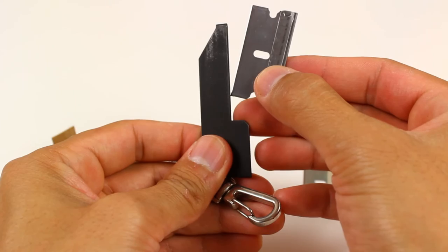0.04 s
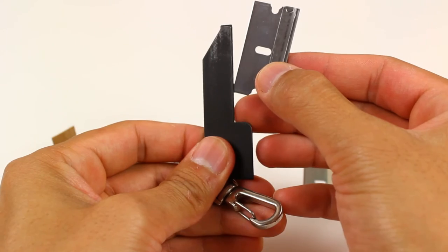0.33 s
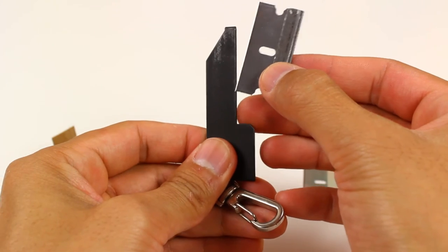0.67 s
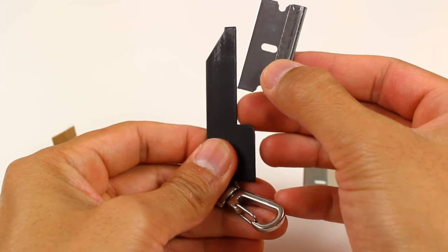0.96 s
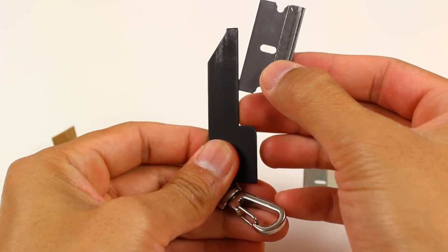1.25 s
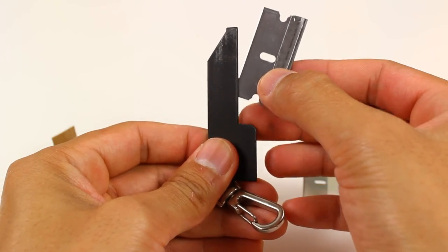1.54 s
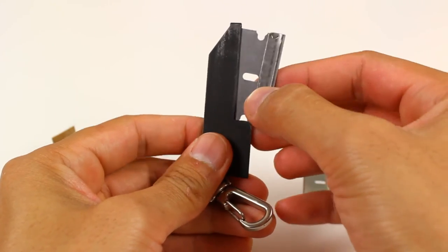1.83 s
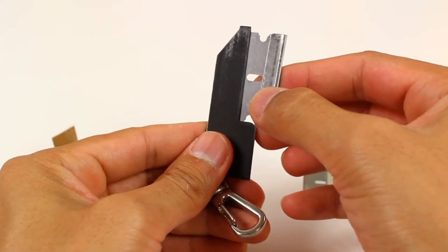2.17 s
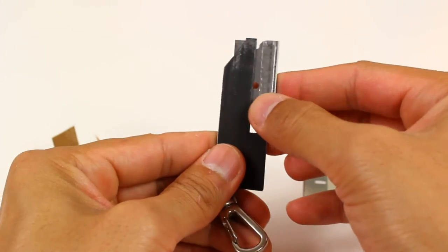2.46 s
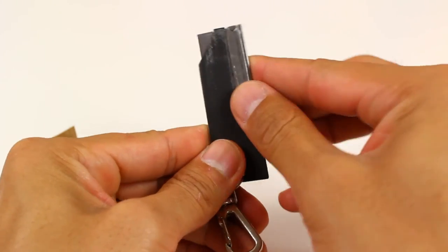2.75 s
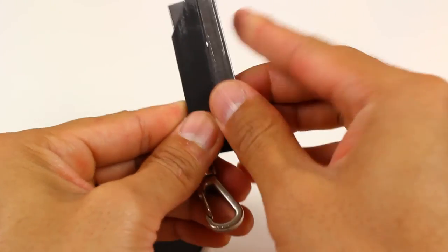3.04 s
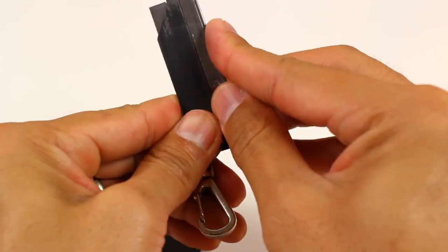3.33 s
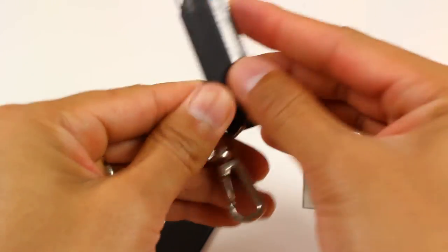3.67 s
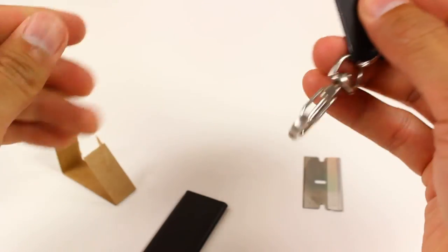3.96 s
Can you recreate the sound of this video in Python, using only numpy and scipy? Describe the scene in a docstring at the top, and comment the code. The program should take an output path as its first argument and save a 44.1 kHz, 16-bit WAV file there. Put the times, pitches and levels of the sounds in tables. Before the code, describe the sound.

A razor blade ticks and scrapes into a small metal holder, then snaps into place.

```python
"""A razor blade is fitted into a small metal key-ring holder, close by in a quiet room.
The loose blade ticks against the holder, catches on the slot, scrapes in and slides home under a
creaking grip, then seats with a sharp snap. The key-ring clasp clinks as the hands let go.
Each hit or tiny slip makes the metal ring briefly. Rumble, hiss, hum and faint, evenly spaced
thumps lie under it all."""
import sys
import numpy as np
from scipy import signal
from scipy.fft import rfft, irfft, next_fast_len
from scipy.io import wavfile
from scipy.ndimage import map_coordinates

SR = 44100
rng = np.random.default_rng(int(sys.argv[2]) if len(sys.argv) > 2 else 0)


def pcm_store(signal):
    """Save signal as 16-bit PCM."""
    levels = np.round(np.clip(np.atleast_2d(signal), -1, 1) * 32767)
    wavfile.write(sys.argv[1], SR, levels.astype(np.int16).T)


N = 176400


def amp(db):
    """Turns decibels into a number to multiply by."""
    return 10 ** (np.asarray(db) / 20)


def unit(x):
    """Scales a sound to an average (rms) level of 1."""
    return x / np.sqrt(np.mean(x ** 2) + 1e-20)


def norm(x):
    """Scales a sound to a total energy of 1."""
    return x / np.sqrt(np.sum(x ** 2) + 1e-20)


def along(points, hz):
    """Reads between (Hz, value) points, with the octaves evenly spaced."""
    point_hz, values = np.transpose(points)
    return np.interp(np.log(hz + 1), np.log(point_hz + 1), values)


def filtered(x, response):
    """Multiplies each frequency in a sound by response(hz)."""
    size = next_fast_len(N + SR // 2)
    return irfft(rfft(x, size) * response(np.fft.rfftfreq(size, 1 / SR)), size)[..., :N]


def add(track, start, sound):
    """Mixes a sound into a track at a start time in seconds."""
    part = track[max(round(start * SR), 0):][:len(sound)]
    part += sound[:len(part)]


def panned(x, db):
    """Sets the left side db above the right; a negative db leans right."""
    return x * amp([[db / 2], [-db / 2]])


def wobble(rate):
    """A smooth curve through rate random values a second."""
    return map_coordinates(rng.standard_normal(int(N * rate / SR) + 4), [np.arange(N) * rate / SR])


def stroke(start, length, rise_s, fall_s):
    """A loudness curve that rises, holds, then fades once length seconds have passed."""
    t = np.arange(N) / SR - start
    return np.clip(t / rise_s, 0, 1) * np.exp(-np.maximum(t - length, 0) / fall_s)


def ring(modes, size=8192):
    """An object's own tones (modes), varied a little each time; each fades 60 dB in its ring time."""
    t = np.arange(size) / SR
    tones = 0
    for hz, db, ring_s in modes:
        gain = amp(db + rng.normal(0, 1.03))
        tones += gain * norm(amp(-60 * t / ring_s) * np.sin(2 * np.pi * (hz * t + rng.random())))
    return norm(tones)


def body(colour, modes, ring_db, size=8192):
    """A small part's answer to one hit: a crack with the given tone colour, plus ringing."""
    cepstrum = irfft(np.log(amp(along(colour, np.fft.rfftfreq(size, 1 / SR)))))
    # Folding the second half onto the first packs the crack's energy at its start.
    cepstrum[1:size // 2] *= 2
    cepstrum[size // 2 + 1:] = 0
    crack = norm(irfft(np.exp(rfft(cepstrum))))
    return norm(crack + amp(ring_db) * ring(modes))


def contacts(rows, colour, modes, ring_db, grit_db):
    """Each contact is a hit followed by a gritty drag that quickly fades."""
    track, t = np.zeros(N), np.arange(SR // 20) / SR
    for start, db, drag_s in rows:
        force = amp(grit_db) * norm(rng.standard_normal(len(t)) * np.exp(-t / drag_s))
        force[0] += 1  # the hit itself
        add(track, start, amp(db) * norm(signal.fftconvolve(force, body(colour, modes, ring_db))))
    return track


def slips(per_second, spread_db):
    """Rubbing surfaces stick and let go, giving tiny kicks at random moments."""
    chance, size, sign = rng.random(N), rng.standard_normal(N), rng.choice([-1, 1], N)
    return (chance < per_second / SR) * sign * amp(spread_db * np.clip(size, -2, 2))


def friction(strokes, answer, points=6):
    """Tiny slips at several points of the edge, each with its own tone colour, shake the metal."""
    slips_per_s, contact_s = 900, .00012
    effort = sum(amp(db) * stroke(start, length, rise_s=.0031, fall_s=.0045)
                 for start, length, db in strokes)
    t = np.arange(len(answer)) / SR
    track = np.zeros(N)
    for _ in range(points):
        kicks = effort * unit(slips(slips_per_s / points, spread_db=2))
        force = rng.standard_normal(len(t)) * np.exp(-t / contact_s)
        one_slip = norm(signal.fftconvolve(answer, force)[:len(t)])
        track += signal.oaconvolve(kicks, one_slip)[:N]
    return track / np.sqrt(points)


def background():
    """Room rumble, faint hiss and the hum of mains power."""
    # The rumble and hiss. Each row: frequency in Hz, relative level in dB.
    noise_colour = [(12, -44.5), (20, 3.5), (45, -5), (168, -16.5), (377, -21.5), (558, -25), (642, -25.5),
                    (897, -28.5), (1480, -31), (1610, -32), (2460, -35), (3250, -36.5), (4670, -38.5),
                    (14300, -42), (16000, -43)]
    # Each row: frequency in Hz, how alike left and right are (1 means the same).
    likeness = [(30, 0.52), (120, 0.079), (300, 0.084), (600, 0.14), (2000, 0.072), (12000, 0.056)]
    # Each row: pitch in Hz, average (rms) level in dB.
    hum_tones = [(120, -67), (239, -75.5), (360, -81)]

    def mid_and_side(hz):
        """Splits the noise into a part both ears share and a part they get with opposite signs."""
        angle = np.arccos(np.clip(along(likeness, hz), -1, 1)) / 2
        return amp(along(noise_colour, hz)) * [np.cos(angle), np.sin(angle)]

    mid, side = filtered(rng.standard_normal((2, N)), mid_and_side)
    t = np.arange(N) / SR
    hum = sum(amp(db) * np.sqrt(2) * np.sin(2 * np.pi * (hz * t + rng.random())) for hz, db in hum_tones)
    return amp(-51.5) * unit(np.array([mid + side, mid - side])) + hum


def thumps():
    """Soft, evenly spaced pulses, likely electrical interference in the microphone amplifier."""
    # Each entry: one pulse's length in seconds.
    lengths = [0.057, .021, .018, 0.021, 0.0217, 0.047, 0.0235, .024]
    first_s, period_s, low_cut_hz = .081, .5565, 1.45
    pulses = sum(stroke(first_s + k * period_s, length, rise_s=.0126, fall_s=.0095)
                 for k, length in enumerate(lengths))
    # The amplifier blocks the very slowest changes.
    return amp(-36) * filtered(pulses, lambda hz: 1j * hz / (low_cut_hz + 1j * hz))


def room(x):
    """Dense early echoes from table and walls, then a short tail, different at each ear."""
    # Each row: frequency in Hz, seconds the echo takes to fade by 60 dB.
    fade_times = [(300, 0.32), (3000, 0.41), (8000, 0.37), (15000, 0.16)]
    wall_delay_s, early_db, early_s = .0045, 3, .011
    hz, t, bands = signal.stft(rng.standard_normal((2, SR // 2)), SR, nperseg=256)
    tail = signal.istft(bands * amp(-60 * t / along(fade_times, hz)[:, None]), SR, nperseg=256)[1]
    t = np.arange(tail.shape[1]) / SR
    echoes = np.sqrt(2) * norm(tail * (1 + amp(early_db) * np.exp(-t / early_s)))
    delayed = np.pad(x, (round(wall_delay_s * SR), 0))
    return signal.fftconvolve(delayed[None], echoes, axes=1)[:, :N]


def creak():
    """A hollow rub over a wavering groan, likely a fingertip slipping as it presses the blade in."""
    # The rub's loudness. Each row: time in seconds, relative level in dB.
    rub_levels = [(2.43, -67), (2.438, -77), (2.448, -61.5), (2.49, -54.5), (2.506, -58), (2.562, -58.5),
                  (2.578, -76), (2.592, -60), (2.624, -77), (2.64, -70)]
    # The rub's tones. Each row: pitch in Hz, relative level in dB, ring time in seconds.
    modes = [(640, -4, 0.02), (1015, 0, .04), (1130, -3, .025), (1270, -4.5, 0.031), (1380, -4, 0.083),
             (1680, -7, 0.03), (2000, -13, 0.017)]
    # The creak's lowest tone sings. Each row: start and length in seconds, level in dB, pitch in Hz.
    groans = [(2.455, .033, -55, 585), (2.494, .01, -54, 625), (2.522, 0.028, -53, 576.5),
              (2.565, 0.035, -60, 568)]
    waver_hz, rough_db = 12.5, 3.5
    times, levels_db = np.transpose(rub_levels)
    level = amp(1 + np.interp(np.arange(N) / SR, times, levels_db, left=-120, right=-120))
    rub = level * unit(signal.fftconvolve(slips(per_second=400, spread_db=0), ring(modes))[:N])
    drift = np.cumsum(waver_hz * wobble(200))
    groan = np.zeros(N)
    for start, length, db, hz in groans:
        tone = np.sin(2 * np.pi * (hz * np.arange(N) + drift) / SR)
        groan += amp(db) * stroke(start, length, rise_s=.005, fall_s=.0095) * tone
    return rub + groan * amp(rough_db * wobble(150))


def clasp():
    """As the fingers let go, the swivel ticks round and the steel clasp swings against its ring."""
    # Each row: start in seconds, level in dB, drag time in seconds.
    swivel_ticks = [(3.711, -32, 0.0024), (3.733, -19.5, 0.0025), (3.755, -26.5, 0.0013),
                    (3.818, -34, .001)]
    clinks = [(3.833, -8.5, .0009), (3.842, -25, .003), (3.8535, -21, 0.0027), (3.876, -26, .0012)]
    # Each part's crack. Each row: frequency in Hz, relative level in dB.
    swivel_colour = [(400, -16), (2000, -19), (4200, -10), (5400, -8), (6600, -11), (8700, -2.5),
                     (11500, -0.5), (13000, -5), (14000, -11), (16000, -13)]
    clasp_colour = [(300, -13), (1200, -19), (2300, -11), (3100, -14), (5000, -10), (6800, -3.5),
                    (7800, -7), (9300, -7), (10200, 1.5), (12800, -1.5), (14300, -2), (16000, -5)]
    # Each part's tones. Each row: pitch in Hz, relative level in dB, ring time in seconds.
    swivel_modes = [(5340, -5.5, 0.0074), (9400, -2, .012), (11100, 4, .008), (12900, -2, .012)]
    clasp_modes = [(2400, -17.5, 0.012), (3870, -7, 0.012), (5130, -4.5, 0.0084), (6540, 2, 0.0061),
                   (7130, -7, 0.021), (8200, -8, 0.0072), (10100, -3.5, .004), (11100, -7, 0.0055),
                   (14000, -11, .012)]
    return (contacts(swivel_ticks, swivel_colour, swivel_modes, ring_db=-8, grit_db=6)
            + contacts(clinks, clasp_colour, clasp_modes, ring_db=-4, grit_db=-2))


def blade_ticks():
    """The loose blade touches the holder and rings freely."""
    # Each row: start in seconds, level in dB, drag time in seconds.
    touches = [(.194, -36.5, 0.0012), (.255, -36.5, 0.00092), (.260, -43, 0.00087), (.267, -37, 0.0018),
               (.481, -31, .012), (.7308, -26, .002), (.733, -28.5, 0.0026), (1.069, -36.5, 0.0043)]
    # The blade's crack. Each row: frequency in Hz, relative level in dB.
    colour = [(500, -23), (2000, -7), (4500, -3), (6000, 0), (7200, -8), (9500, 1), (12500, -11),
              (16000, -12)]
    # The blade's tones. Each row: pitch in Hz, relative level in dB, ring time in seconds.
    modes = [(5200, -1, .09), (6010, -3, .012), (6300, -11, .08), (8160, 3, .07), (11780, -4, .018)]
    return contacts(touches, colour, modes, ring_db=1, grit_db=-1)


def blade_in_slot():
    """The edge catches on the mouth of the slot and scrapes along it, which dulls its ringing."""
    # Each row: start in seconds, level in dB, drag time in seconds.
    catches = [(1.339, -37.5, 0.0022), (1.358, -35, 0.0011), (1.379, -35.5, 0.0027), (1.446, -40, .004),
               (1.486, -38.5, 0.0025), (1.518, -38, 0.0035), (1.553, -34.5, 0.0038), (1.573, -33, 0.009),
               (1.601, -33.5, 0.0055), (1.649, -46, .004), (1.691, -35, .008), (1.732, -29, 0.0017),
               (1.746, -28.5, 0.0017), (1.814, -23, 0.0024), (1.8255, -31, .002)]
    # Each row: start and length in seconds, level in dB.
    scrapes = [(1.62, .1, -63), (1.73, 0.044, -54.5), (1.785, .042, -57)]
    # The crack of edge on slot. Each row: frequency in Hz, relative level in dB.
    colour = [(500, -8), (3500, -13.5), (4800, -5.5), (7500, -4), (10200, -1.5), (12400, 2), (13600, -9),
              (16000, -12)]
    # The metal's tones. Each row: pitch in Hz, relative level in dB, ring time in seconds.
    modes = [(4760, -3, .06), (5190, -5.5, 0.036), (6020, -1, .008), (10350, -1.5, .006),
             (12600, -3, 0.0048)]
    return (contacts(catches, colour, modes, ring_db=-5, grit_db=7)
            + friction(scrapes, body(colour, modes, ring_db=-10)))


def blade_squeaks():
    """Where the edge bites, the blade flexes and sings one tone, its pitch set by the contact point."""
    # Each row: start and length in seconds, level in dB, pitch in Hz.
    bites = [(1.377, 0.0054, -60.5, 4730), (1.515, .007, -61, 5100), (1.569, 0.013, -64.5, 4900),
             (1.599, .01, -64, 4730), (1.738, .03, -56.5, 5280), (1.752, .026, -56.5, 4460),
             (1.745, 0.031, -60.5, 4890)]
    ring_s = .029
    track, t = np.zeros(N), np.arange(SR // 10) / SR
    for start, length, db, hz in bites:
        force = rng.standard_normal(len(t)) * (t < length)
        squeak = norm(signal.fftconvolve(force, ring([(hz, 0, ring_s)])))
        add(track, start, amp(db) * np.sqrt(length * SR) * squeak)
    return track


def blade_in_holder():
    """The blade knocks and slides inside the holder, which stops its ringing almost at once."""
    # Each row: start in seconds, level in dB, drag time in seconds.
    knocks = [(1.952, -31.5, 0.0014), (1.961, -35.5, 0.0024), (2.013, -36.5, 0.0054),
              (2.424, -28.5, 0.0044), (2.460, -34.5, 0.002), (2.554, -22, 0.0066), (2.7915, -25, 0.0017),
              (3.295, -28, 0.0014), (3.3215, -29, 0.0018)]
    # Each row: start and length in seconds, level in dB.
    slides = [(2.11, 0.037, -67.5), (2.224, 0.019, -62), (2.313, 0.045, -59.5), (2.425, 0.038, -61.5),
              (2.56, .02, -72)]
    # The holder's crack. Each row: frequency in Hz, relative level in dB.
    colour = [(400, -5), (2000, -7.5), (3200, -8), (4600, -9), (7200, -7), (9500, 0.5), (11000, -5),
              (13200, -1), (16000, -19)]
    # The holder's tones. Each row: pitch in Hz, relative level in dB, ring time in seconds.
    modes = [(2870, 0, .015), (3240, -5, .012), (5270, -4.5, .008), (7060, 3, .009), (9100, -30, .007),
             (9700, -10, .008)]
    return (contacts(knocks, colour, modes, ring_db=-3.5, grit_db=13)
            + friction(slides, body(colour, modes, ring_db=-10)))


def blade_snap():
    """The blade snaps into its seat: one hard, bright hit with little ringing."""
    # The one row: start in seconds, level in dB, drag time in seconds.
    snap = [(3.3472, -5, 0.00036)]
    # The snap's crack. Each row: frequency in Hz, relative level in dB.
    colour = [(300, -27), (1200, -24), (2100, -28), (3200, -14), (4500, -15), (6300, -5.5), (8200, -5.5),
              (9500, -0.5), (11600, -3), (13100, 0), (14200, -7), (16000, -12)]
    # The snap's tones. Each row: pitch in Hz, relative level in dB, ring time in seconds.
    modes = [(3120, -5.5, 0.018), (6370, -6, .02), (9460, -1.5, 0.023), (12300, -4, .03),
             (13100, -2, 0.028)]
    return contacts(snap, colour, modes, ring_db=-12.5, grit_db=-6.5)


def scene():
    """The handling sounds, nearly centred, with their room echo, over the thumps and background."""
    blade = blade_ticks() + blade_in_slot() + blade_squeaks() + blade_in_holder() + blade_snap()
    near = blade + clasp() + creak()
    return panned(near, db=-.8) + amp(-3.5) * room(near) + thumps() + panned(background(), db=-.9)


def record(dry):
    """Cuts off the very highest treble."""
    return filtered(dry, lambda hz: hz < 15900)


dry = scene()
out = record(dry)
pcm_store(out)
```